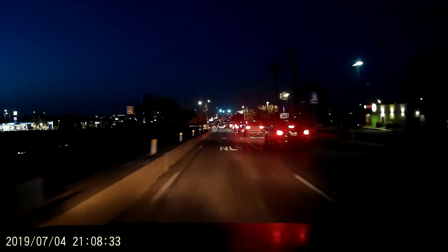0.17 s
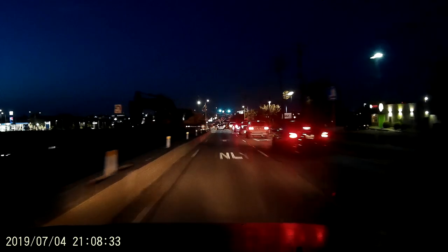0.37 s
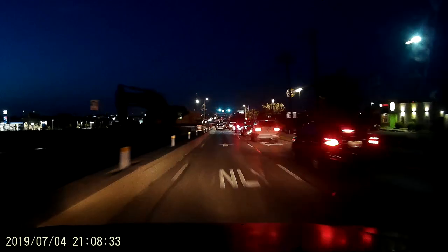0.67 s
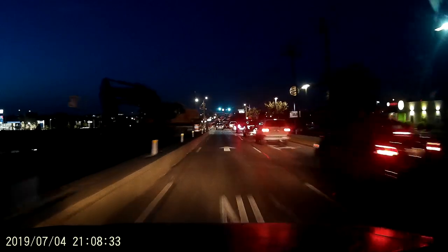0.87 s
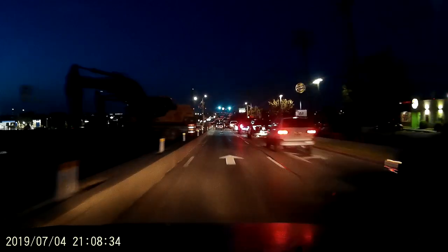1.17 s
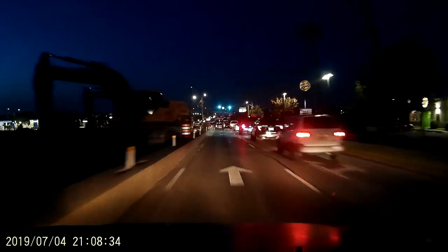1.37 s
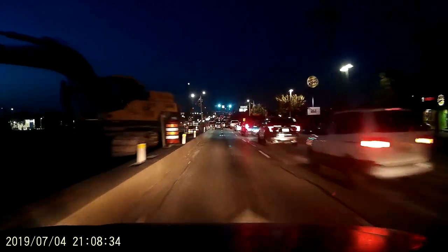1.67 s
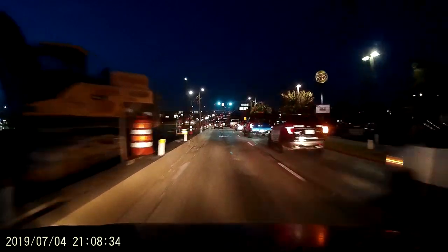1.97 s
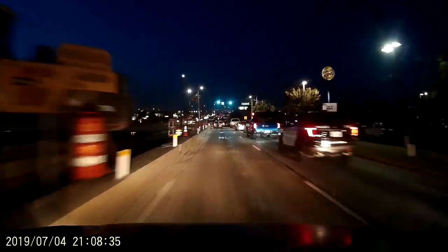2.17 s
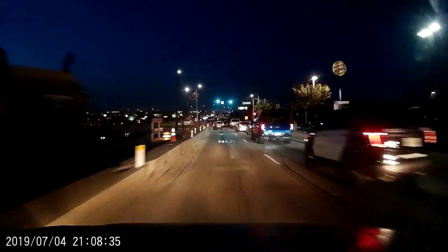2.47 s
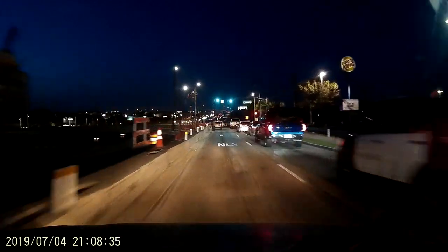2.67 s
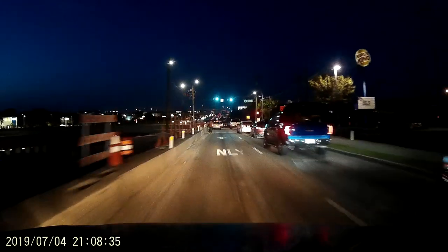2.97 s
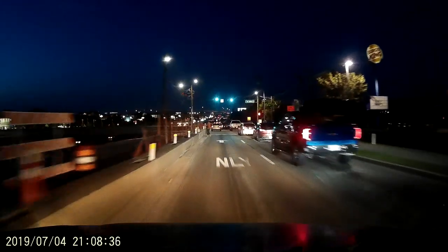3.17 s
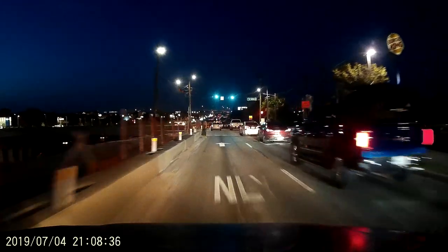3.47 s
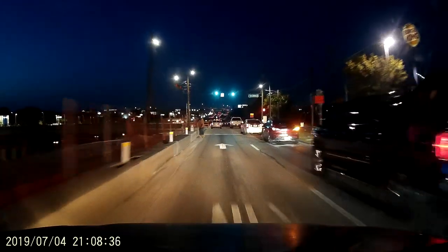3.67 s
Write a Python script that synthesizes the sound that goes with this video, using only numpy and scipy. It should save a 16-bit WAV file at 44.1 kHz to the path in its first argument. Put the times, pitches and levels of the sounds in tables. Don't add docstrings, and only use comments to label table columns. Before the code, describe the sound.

Car engine drone, deep and almost pure, booms inside the cabin over steady muffled tyre rumble. It is strongest in the first 1.4 seconds, then weaker, sinking in pitch as the car slows. Dull seam thuds land near 0.7, 1.05, 1.9 (loudest) and 2.8 seconds, with fainter ones at 1.3 and 3.2. A tiny trim tick comes at 0.9; soft falling tyre whine runs 1.7-3.5. Faint microphone hiss throughout, after a tiny starting click.

```python
import sys
import numpy as np
from scipy import signal
from scipy.fft import rfft, irfft, next_fast_len
from scipy.io import wavfile

SR = 44100
rng = np.random.default_rng(int(sys.argv[2]) if len(sys.argv) > 2 else 0)


def dump_mix(stems):
    frames = np.atleast_2d(stems).T
    limited = np.clip(frames, -1, 1)
    pcm = np.round(limited * 32767).astype(np.int16)
    wavfile.write(sys.argv[1], SR, pcm)


def nominal_scale(level):
    x = np.asarray(level, float) / 20
    return 10 ** x


N = 168021

# (frequency [Hz], density [dB per Hz])
HISS_SPECTRUM = [(500, 1), (4000, 2.5), (9000, 1.5), (14500, 2.5), (15100, -1), (15800, -6.5)]
# (time [s], level [dB])
ROAD_VIGOUR = [(0, -49.5), (.35, -49), (.7, -49.5), (1.0, -50), (1.35, -49.5), (1.6, -50), (2.05, -49.5),
               (2.35, -50), (2.7, -52.5), (3.1, -51.5), (3.45, -51.5), (3.8, -52.5)]
# (frequency [Hz], density [dB per Hz])
RUMBLE_SPECTRUM = [(4, -20), (20, -11), (40, -1.5), (70, -3), (110, -5.5), (170, -11), (300, -10),
                   (420, -20)]
# (frequency [Hz], density [dB per Hz])
ROAR_SPECTRUM = [(420, 2), (600, 0.5), (900, -6.5), (1200, -9.5), (1700, -20), (2400, -28.5), (2900, -36),
                 (6000, -53)]
# (frequency [Hz], width [Hz], level at mean vigour [dB], share of vigour swing [dB/dB])
CABIN_MODES = [(35.1, 10, -39.5, 0.2), (92, 18.5, -53, -1.5), (140.8, 23.2, -48.5, -2.5),
               (224.4, 30, -52, 1), (283.4, 26.2, -47, 1.5), (332.8, 36, -56, 1.0),
               (462.4, 18.5, -52.5, 1.0), (484, 15.5, -53.5, .8), (574, 19, -70, -1), (680.6, 69, -61, 1.0),
               (973, 68, -60.5, 1.0), (1085, 38, -62, 1.0), (2270, 210, -76.5, 0), (3300, 400, -82, 0)]
# (time [s], peak level [dB], body pitch [Hz], panel pitch [Hz],
# panel level re body [dB])
SEAM_HITS = [
    (.66, -34, 348, 572, -7),
    (1.045, -35, 330, 480, -8),
    (1.87, -29.5, 347, 466, -4),
    (2.78, -32.5, 262, 480, -16),
    (3.2, -42, 312, 484, 1),
    (1.31, -44, 300, 478, 4),
]
# (frequency [Hz], level re body [dB])
SHARED_SEAM_MODES = [(555, -12), (990, -24), (1220, -28)]
# (frequency [Hz], level [dB])
TRIM_MODES = [(3470, -63), (3560, -72), (3740, -69)]
# (time [s], pitch [Hz], level [dB])
WHINE_TRACK = [(1.72, 234.5, -44), (1.95, 229, -42), (2.2, 223.5, -40), (2.45, 220, -42.5),
               (2.7, 212, -41.5), (2.95, 208.5, -41.5), (3.2, 206, -45.5), (3.5, 203, -48)]
# (time [s], pitch [Hz], level [dB])
ENGINE_TRACK = [(0, 55, -33.5), (.25, 53.83, -27.5), (.6, 54.25, -31.5), (.82, 53.8, -34.5),
                (1.1, 52.3, -35), (1.38, 52.34, -29), (1.55, 48.6, -45.5), (1.9, 46.8, -48),
                (2.13, 49.65, -35.5), (2.31, 47.4, -39), (2.5, 46, -35.5), (2.72, 43.7, -36.5),
                (2.95, 41.8, -34), (3.25, 39.33, -46), (3.45, 37.47, -40), (3.6, 35.67, -39),
                (3.8, 38.1, -39.5)]


def rms_one(x):
    return x / np.sqrt(np.mean(x ** 2) + 1e-20)


def in_time(rows):
    time_s, *columns = np.transpose(rows)
    return [np.interp(np.arange(N) / SR, time_s, column) for column in columns]


def drift(rate_hz):
    r = np.exp(-2 * np.pi * rate_hz * 40 / SR)
    noise = rng.standard_normal(N // 40 + 2002)
    slow = signal.lfilter([1], [1, -2 * r, r * r], noise)[2000:]
    slow = rms_one(slow - slow.mean())
    return np.interp(np.arange(N) / 40, np.arange(len(slow)), slow)


def coloured(spectrum):
    size = next_fast_len(N)
    hz, db = np.transpose(spectrum)
    bin_hz = np.maximum(np.arange(size // 2 + 1) * SR / size, 1)
    gain = nominal_scale(np.interp(np.log(bin_hz), np.log(hz), db))
    return irfft(rfft(rng.standard_normal(size)) * gain, size)[:N]


def resonate(x, hz, width_hz):
    r = np.exp(-np.pi * max(width_hz, 1) / SR)
    zeros = [(1 - r * r) / 2, 0, (r * r - 1) / 2]
    poles = [1, -2 * r * np.cos(2 * np.pi * hz / SR), r * r]
    return signal.lfilter(zeros, poles, x)


def tone(hz, db, wobble_db, wander):
    wavering_hz = hz * (1 + wander * drift(6.8))
    phase = 2 * np.pi * np.cumsum(wavering_hz) / SR
    return np.sqrt(2) * nominal_scale(db + wobble_db * drift(7)) * np.sin(phase)


def knock(start_s, db, hz, rise_s, hold_s, t60_s):
    t = np.maximum(np.arange(N) / SR - start_s, 0)
    fall_db = 60 * np.maximum(t - rise_s - hold_s, 0) / t60_s
    rise = np.sin(np.pi / 2 * np.minimum(t / rise_s, 1)) ** 2
    return nominal_scale(db - fall_db) * rise * np.sin(2 * np.pi * hz * t)


def hiss():
    hiss_db = -70
    return nominal_scale(hiss_db) * rms_one(coloured(HISS_SPECTRUM))


def whistle(t):
    whistle_hz, rms_db = 13598.5, -98
    return nominal_scale(rms_db + 3) * np.sin(2 * np.pi * whistle_hz * t)


def seam_swell_db():
    lift_db, width_s, lag_s, loudest_db = 1.5, .046, .02, -29.5
    t = np.arange(N) / SR
    swell_db = np.zeros(N)
    for s, db, *_ in SEAM_HITS:
        swell_db += lift_db * nominal_scale(db - loudest_db) * np.exp(-((t - s - lag_s) / width_s) ** 2)
    return swell_db


def rolling(vigour_db, grain_db):
    over_vigour_db = 13.5
    joint_db = RUMBLE_SPECTRUM[-1][1]
    spectrum = RUMBLE_SPECTRUM[:-1] + [(hz, db + joint_db) for hz, db in ROAR_SPECTRUM]
    return nominal_scale(vigour_db + over_vigour_db + grain_db) * rms_one(coloured(spectrum))


def cabin(vigour_db, grain_db):
    patch_db = 1.0
    swing_db = vigour_db - vigour_db.mean()
    out = np.zeros(N)
    for hz, width_hz, db, share in CABIN_MODES:
        pole_width_hz = 1.39 * width_hz
        shake = rng.standard_normal(N + SR)
        once = resonate(shake, hz, pole_width_hz)
        ringing = resonate(once, hz, pole_width_hz)[SR:]
        level_db = db + share * swing_db + grain_db + patch_db * drift(4.2)
        out += nominal_scale(level_db) * rms_one(ringing)
    return out


def road():
    vigour_db, = in_time(ROAD_VIGOUR)
    grain_db = .6 * drift(9) + seam_swell_db()
    return rolling(vigour_db, grain_db) + cabin(vigour_db, grain_db)


def seams():
    rise_s, hold_s, t60_s, scatter_s = .014, .018, .05, .004
    out = np.zeros(N)
    for s, db, body_hz, panel_hz, panel_db in SEAM_HITS:
        modes = [(body_hz, 0), (panel_hz, panel_db)] + SHARED_SEAM_MODES
        for hz, mode_db in modes:
            start_s = s + rng.uniform(0, scatter_s)
            out += knock(start_s, db + mode_db, hz, rise_s, hold_s, t60_s)
    return out


def tick():
    start_s, rise_s, hold_s, t60_s = .886, .002, .002, .05
    return sum(knock(start_s, db, hz, rise_s, hold_s, t60_s) for hz, db in TRIM_MODES)


def whine():
    fade_s, wobble_db, wander = .08, 1.2, .0015
    t = np.arange(N) / SR
    inside_s = np.minimum(t - WHINE_TRACK[0][0], WHINE_TRACK[-1][0] - t)
    on = np.clip(inside_s / fade_s + 1, 0, 1)
    return on * tone(*in_time(WHINE_TRACK), wobble_db, wander)


def engine():
    return tone(*in_time(ENGINE_TRACK), wobble_db=1.0, wander=.003)


def scene():
    return (road() + seams() + tick() + whine() + engine())[None]


def low_pass(x):
    return signal.sosfilt(signal.butter(12, 16330, fs=SR, output="sos"), x)


def record(dry):
    start_s, fade_s, step_db, step_decay_s, cutoff_hz = .0362, .001, -38, .0003, 15830
    t = np.arange(N) / SR - start_s
    x = dry + hiss() + whistle(t)
    step = nominal_scale(step_db) * np.exp(-np.maximum(t, 0) / step_decay_s)
    x = (t >= 0) * (x * np.clip(t / fade_s, 0, 1) + step)
    lowpass = signal.ellip(14, .5, 70, cutoff_hz, fs=SR, output="sos")
    mix = signal.sosfilt(lowpass, x)
    return low_pass(mix)


dry = scene()
out = record(dry)
dump_mix(out)
```